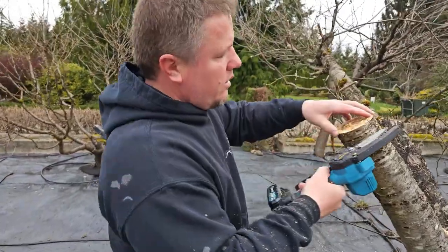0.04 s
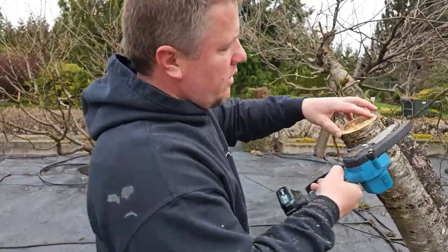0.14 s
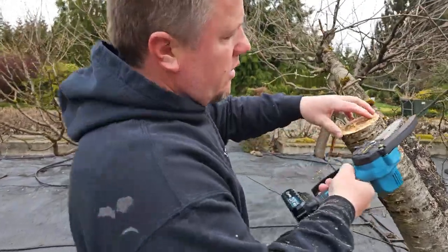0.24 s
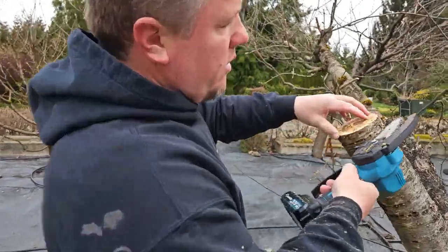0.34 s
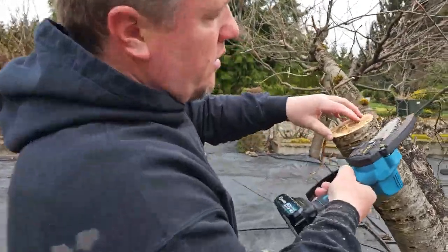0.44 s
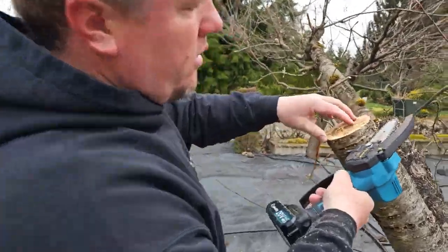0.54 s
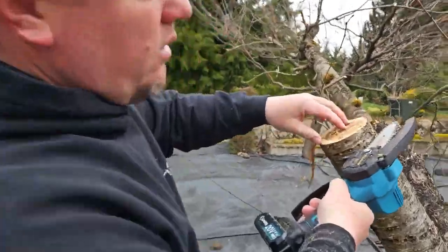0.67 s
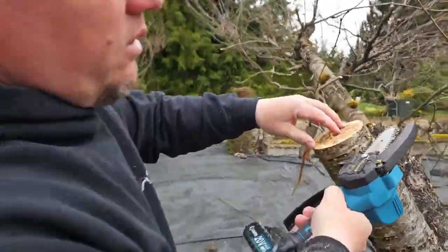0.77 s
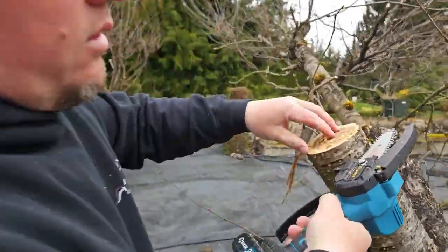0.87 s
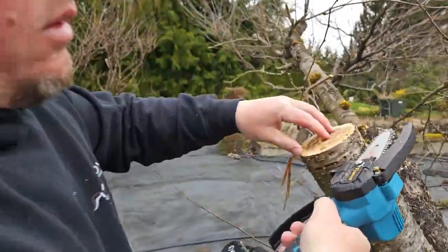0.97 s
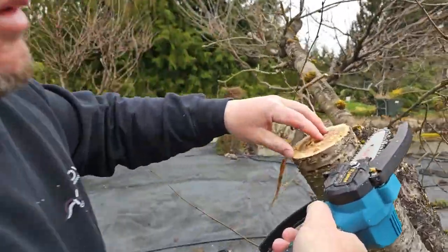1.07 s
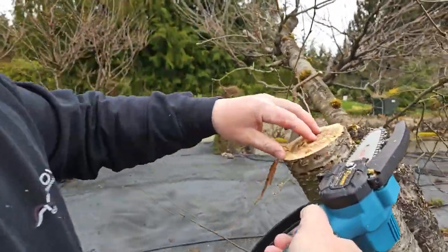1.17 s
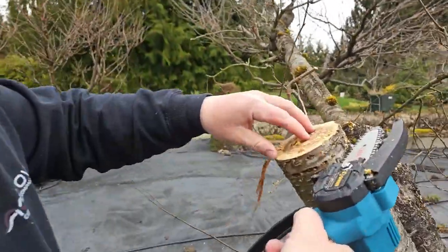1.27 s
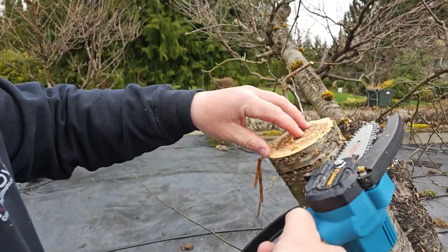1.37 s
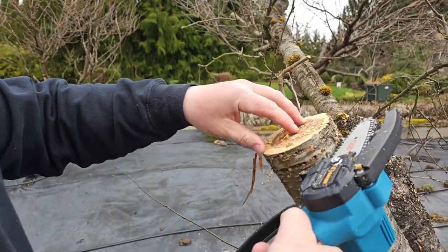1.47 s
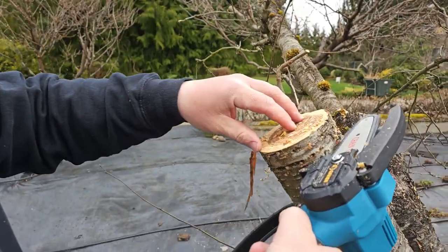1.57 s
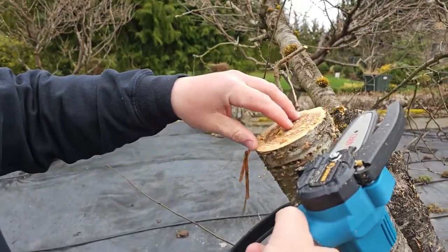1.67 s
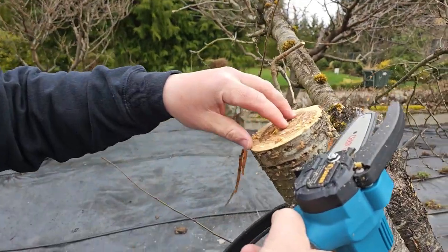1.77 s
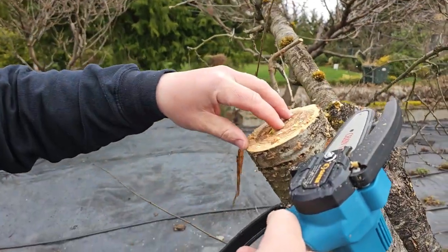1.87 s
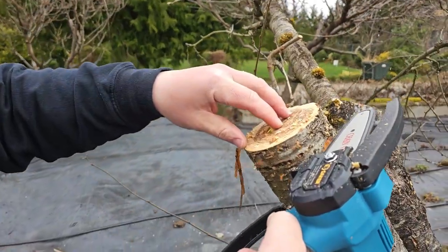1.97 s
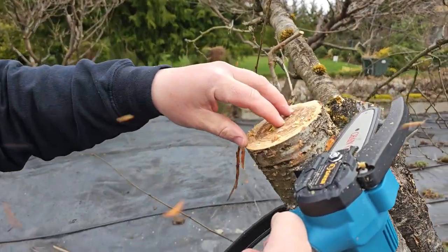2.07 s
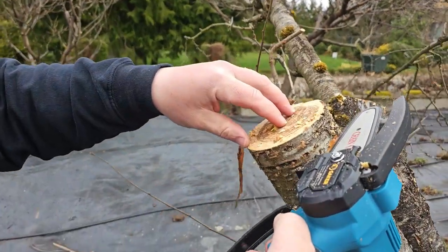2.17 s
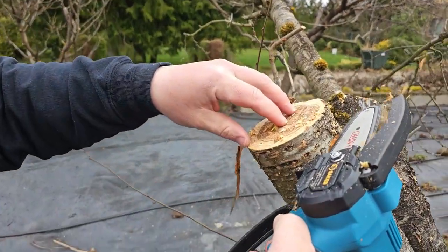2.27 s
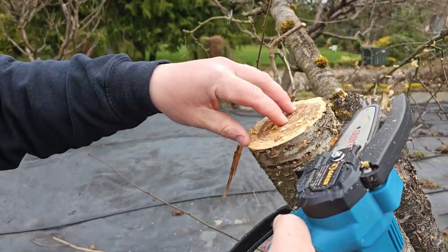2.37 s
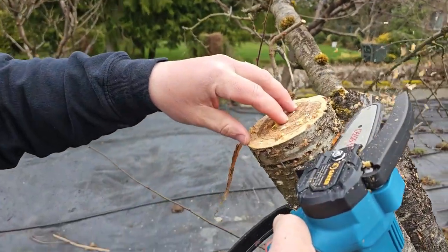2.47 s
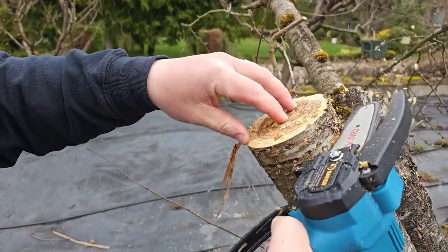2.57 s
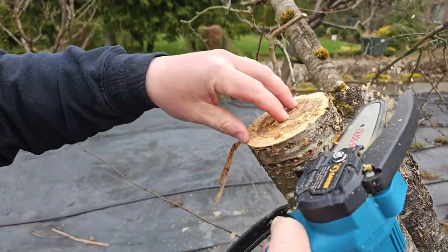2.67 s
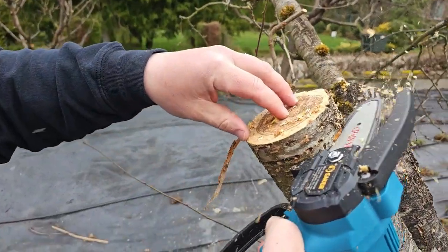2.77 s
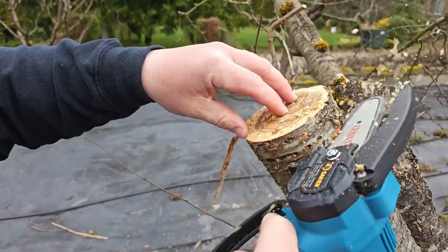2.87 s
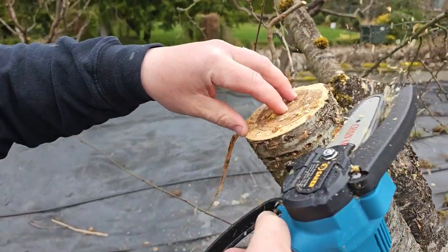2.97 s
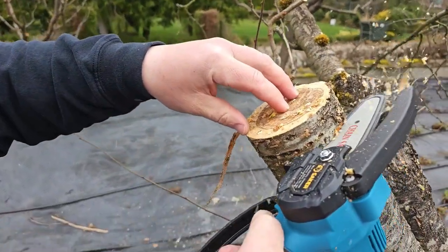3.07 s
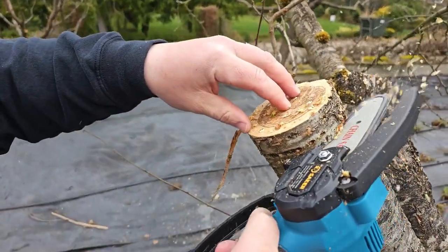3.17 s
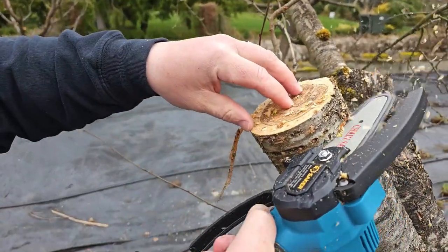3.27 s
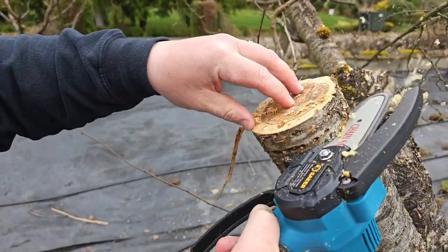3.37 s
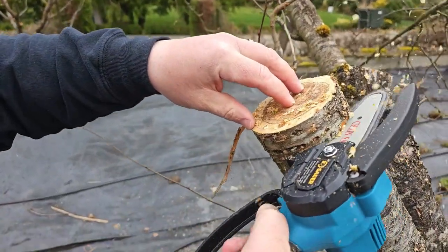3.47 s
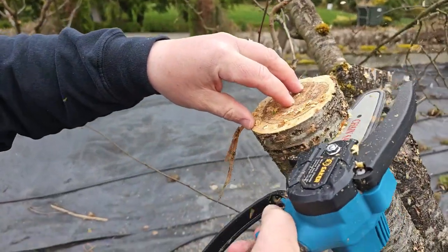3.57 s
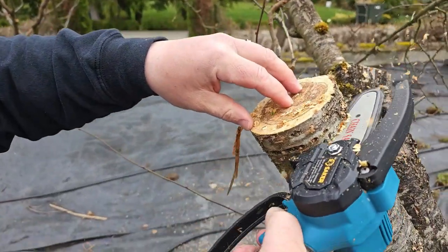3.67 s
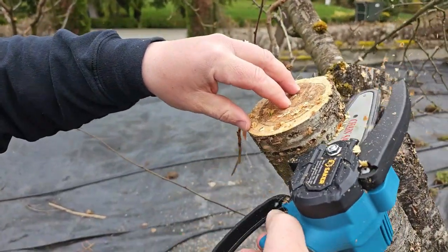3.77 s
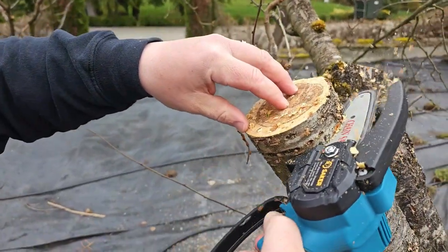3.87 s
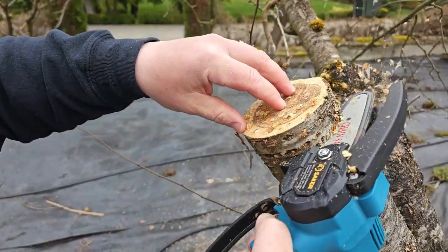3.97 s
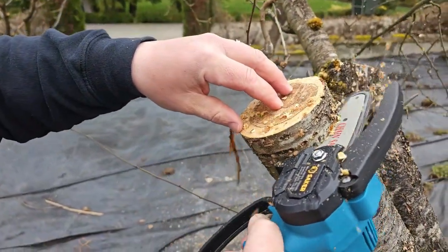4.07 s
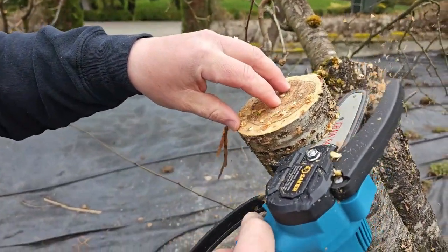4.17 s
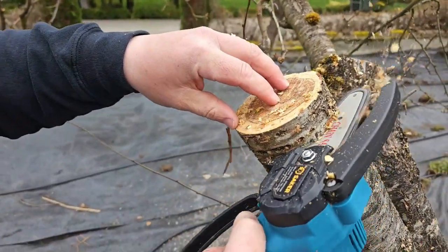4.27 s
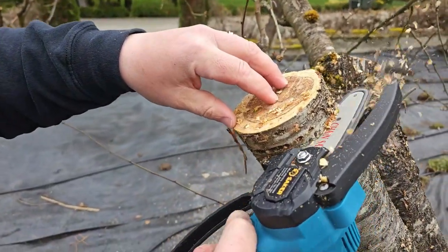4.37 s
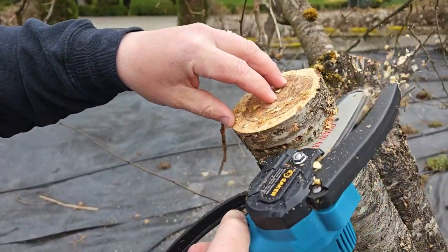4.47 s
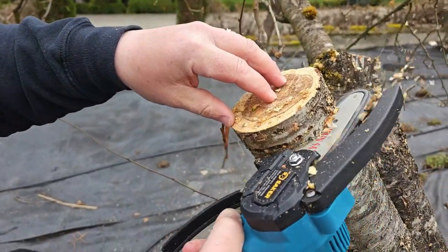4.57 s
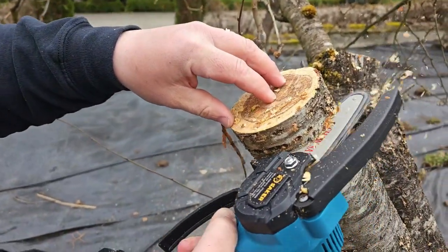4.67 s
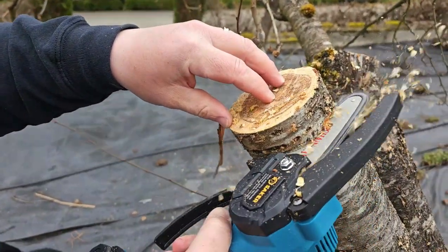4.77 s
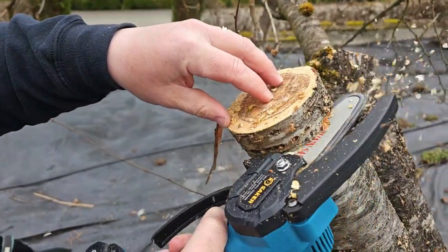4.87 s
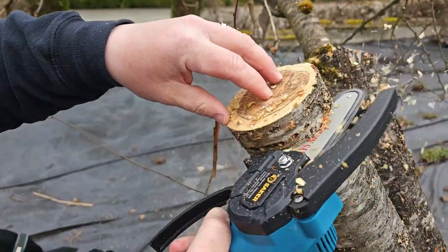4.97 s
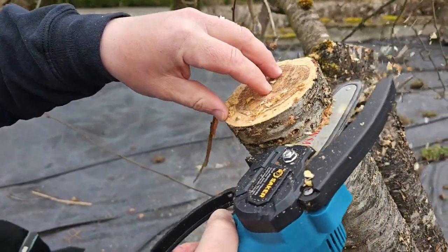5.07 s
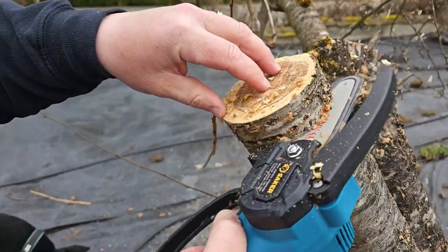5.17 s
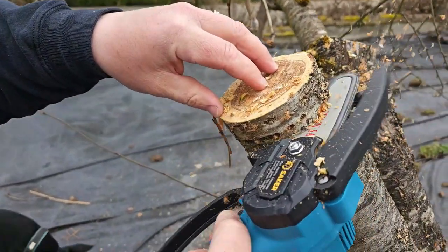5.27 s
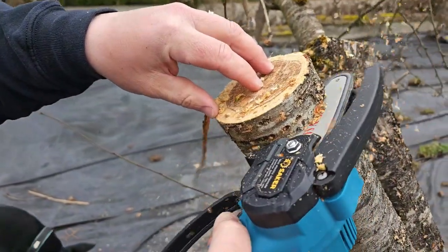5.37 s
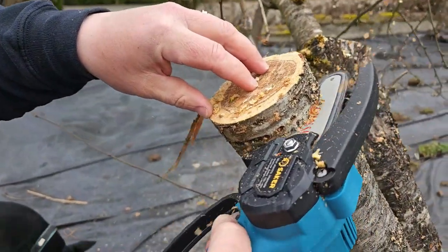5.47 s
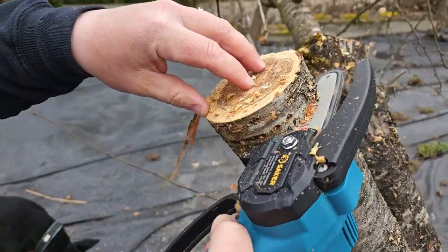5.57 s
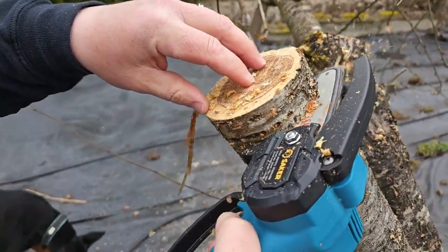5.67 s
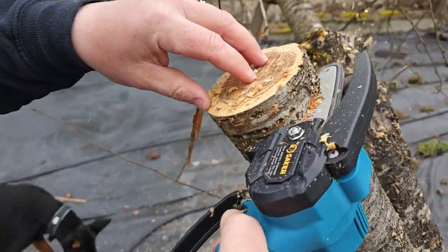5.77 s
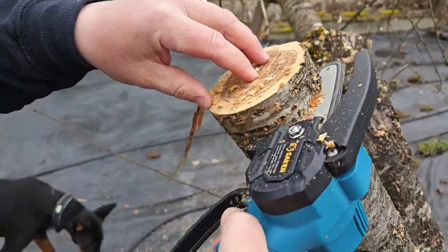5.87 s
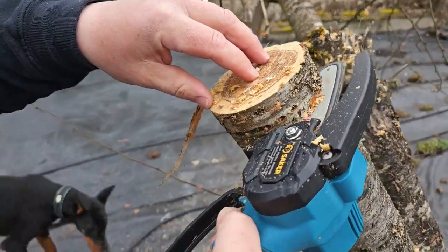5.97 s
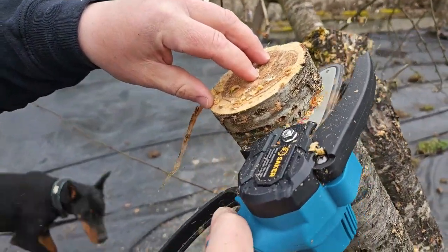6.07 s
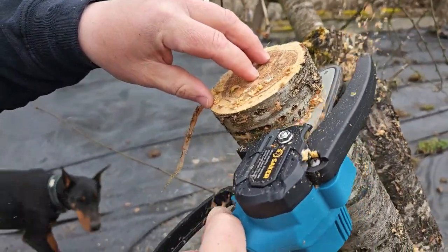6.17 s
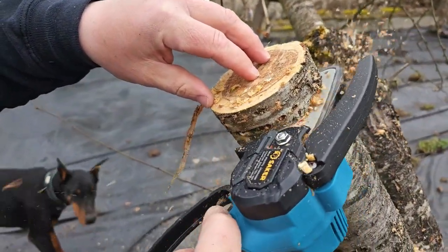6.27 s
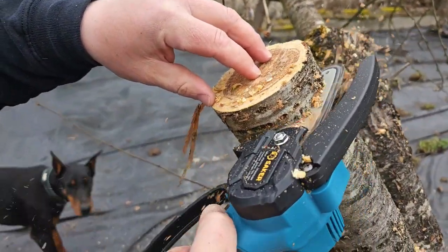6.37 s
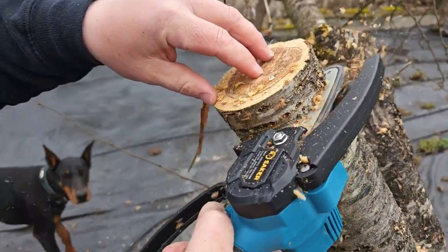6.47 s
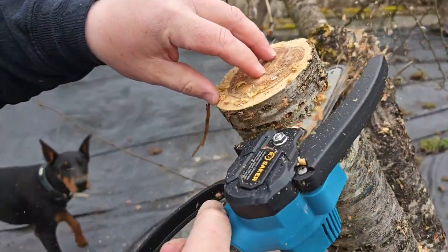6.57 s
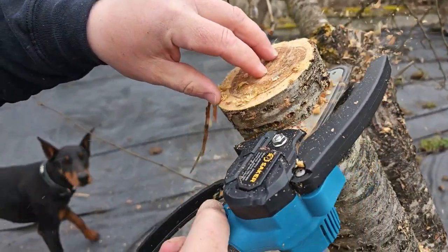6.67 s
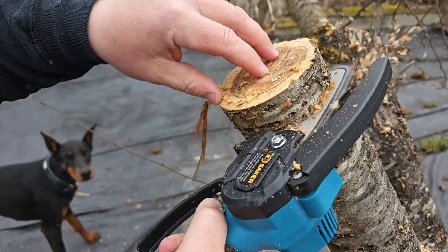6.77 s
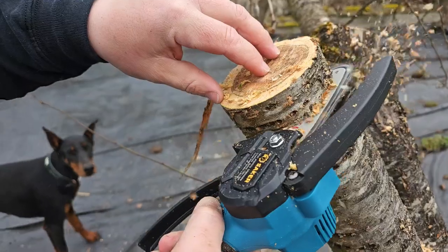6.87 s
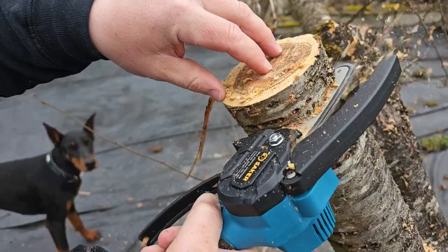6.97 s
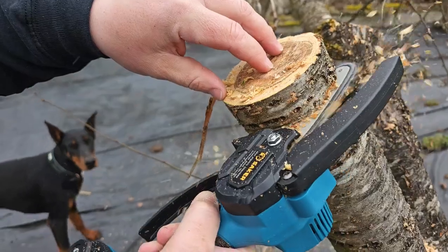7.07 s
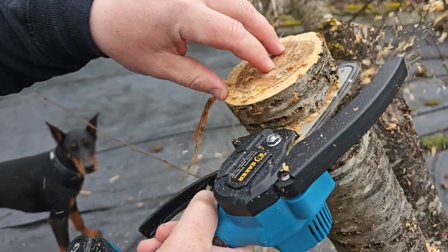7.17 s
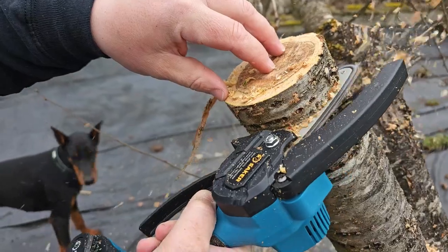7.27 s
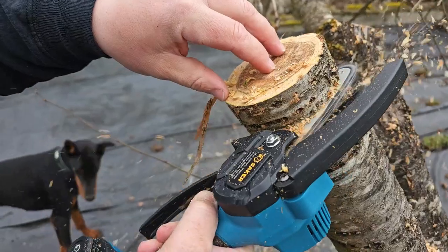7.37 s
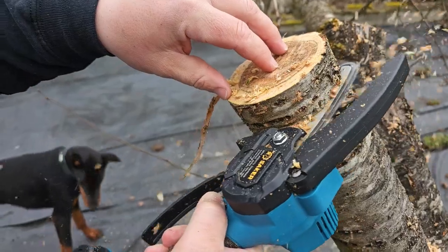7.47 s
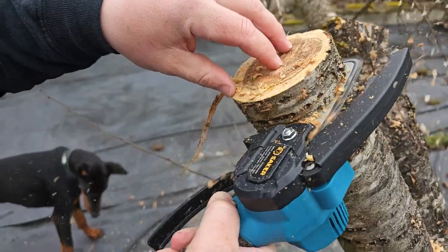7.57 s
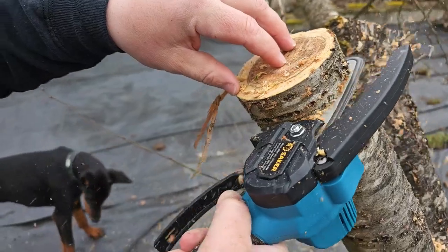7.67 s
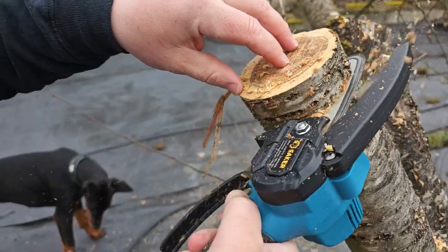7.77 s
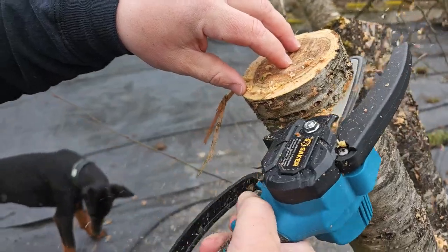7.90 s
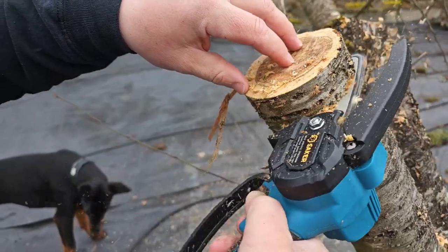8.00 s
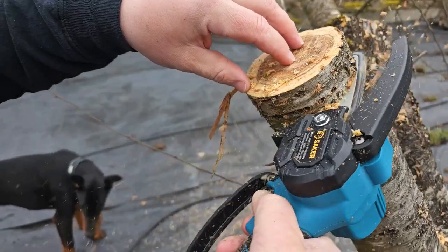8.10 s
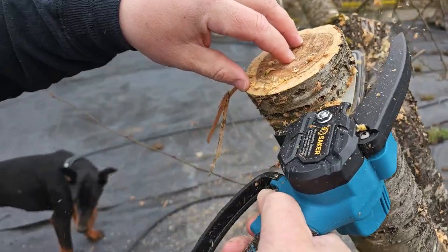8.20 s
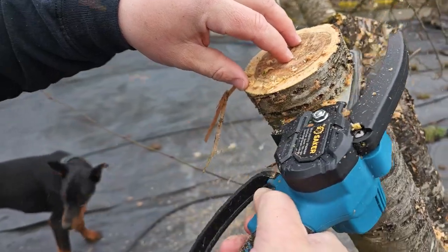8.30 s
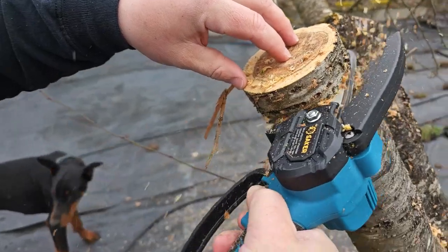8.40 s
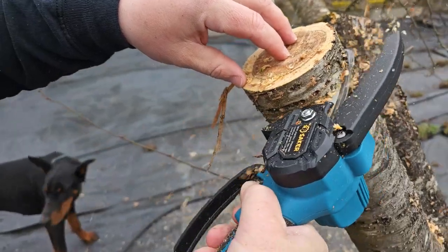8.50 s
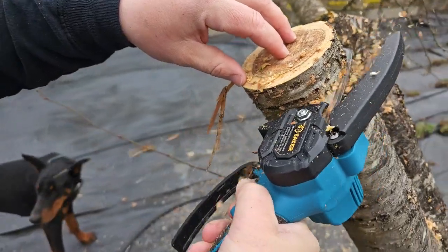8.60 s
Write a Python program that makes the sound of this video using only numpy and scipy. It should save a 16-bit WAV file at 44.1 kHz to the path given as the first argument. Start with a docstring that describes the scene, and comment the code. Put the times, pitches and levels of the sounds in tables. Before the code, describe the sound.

After a hushed outdoor pause with tiny handling noises, an electric mini chainsaw snaps to full speed, its raspy buzz sagging as it bites wood.

```python
"""A small battery chainsaw is switched on in a garden and cuts through a branch close to a stereo microphone.
The motor is a few low turn orders and a wobbling gear whine; chain, bar and wood are resonances struck by
random contacts, with single slaps and hard bites on top. Wind on the microphone ports is low shaped noise.
Before the start a sleeve rustles, the bar drags on bark and small things tick; a distant garden murmurs."""
import sys
import numpy as np
from scipy import signal
from scipy.fft import rfft, irfft
from scipy.io import wavfile
from scipy.ndimage import uniform_filter1d

SR = 44100
rng = np.random.default_rng(int(sys.argv[2]) if len(sys.argv) > 2 else 0)


def undo_db(level):
    """Turn decibels back into plain size, where 20 dB means ten times bigger."""
    steps = np.asarray(level, float) / 20
    return 10 ** steps


def materialize(psi):
    """Save the field psi as 16-bit PCM at rate SR to the path in sys.argv[1].

    A 1-D psi becomes a single channel; in a 2-D psi each row is a channel.
    """
    bounded = np.clip(np.atleast_2d(psi).T, -1, 1)
    quanta = np.round(bounded * 32767).astype(np.int16)
    wavfile.write(sys.argv[1], SR, quanta)


N = 381024   # samples, 8.64 s

# All levels stand ahead of the gain in record();
# those of the motor, chain and clinks also ahead of spin_up(); the snags are not.
# Resonance tables: centre_hz, width_hz (nominal), level_db (relative), left_right_likeness, right_lag_ms
# the wood, from its body up to a bright edge
WOOD = [(1160, 185, -9.5, 0.92, -0.21), (1293, 275, -3.5, 0.72, -0.33), (1695, 168, 0.5, 0.99, 0.067),
        (2074, 135, 0.5, 0.99, -0.036), (2260, 193, -1.5, 0.94, -0.048), (5440, 600, -5, 1, 0.038)]
# the low rumble of the cut
KERF = [(677, 77, -9.5, 0.99, -0.11), (763, 83, -3.5, 0.92, -0.17), (965, 175, -10, 0.86, -0.18)]
# the free length of the bar
BLADE = [(2830, 280, -3, 1, 0.33), (3520, 300, -3, 0.96, -0.023), (3950, 560, -0.5, 0.94, 0.072)]
# the ringing bar
BAR = [(7695, 650, -0.5, 0.82, 0.028), (8300, 520, -1.8, 0.92, 0.027)]
# the ringing chain links
LINKS = [(9390, 620, -0.5, 0.69, 0.0094), (10110, 420, -3.5, 0.47, 0.0033)]
# the hiss on top of the metal
HISS = [(12960, 2500, -5, 0.32, -0.016), (15000, 1450, 0, 0.49, -0.046)]
# the chain gathers speed: time_s, level_db
SPIN_UP = [(1.63, -75), (1.639, -17.5), (1.649, -14.5), (1.66, -7.5), (1.68, -8)]

TURNS_PER_SPROCKET = 6.5   # motor turns in one sprocket turn
SWAY_MS = .025   # spread: the saw sways, so the path to the right port keeps changing


def motor(turns, speed):
    """Low orders of the turn fade as the speed sags; a tooth whine wobbles with the uneven load."""
    free_turns_per_s, gear_teeth = 416, 12
    start_surge_db = 7
    # (dB running free, dB lost per turn/s below free speed, lowest dB under load)
    orders = [(-36.5, 0.14, -53), (-39.5, 0.12, -56.5), (-37, 0.13, -49)]
    # the hum stands out briefly: time_s, half_length_s, level_db
    hum_bumps = [(3.6, 0.16, -44), (5.4, 0.16, -43), (5.8, 0.26, -42), (7.92, 0.13, -37)]
    # the third order does too: time_s, half_length_s, level_db
    third_bumps = [(3.4, 0.23, -36), (4.6, 0.24, -34), (7.5, 0.61, -36), (7.87, 0.082, -34.5)]
    # gear whine, mostly up when the speed sags: time_s, level_db
    whine_levels = [(1.64, -11), (1.66, -17), (1.68, -37), (1.72, -42), (2.4, -56), (2.7, -36), (3.6, -31),
                    (3.9, -27.5), (4.2, -38), (4.4, -26.5), (4.85, -25), (5.05, -28), (5.18, -23),
                    (5.3, -26), (5.6, -36), (5.8, -23), (6.0, -33.5), (6.2, -26.5), (6.9, -24.5),
                    (7.2, -23), (7.75, -24.5), (8.08, -24), (8.35, -28), (8.64, -28)]

    sag = free_turns_per_s - speed
    hum_db, second_db, third_db = [
        np.maximum(free_db + start_surge_db * surge() - loss * sag, loaded_db)
        for free_db, loss, loaded_db in orders]
    hum_db = swells(hum_bumps, 6, hum_db)
    third_db = swells(third_bumps, 3.2, third_db)
    fourth_db = second_db + 6.5

    angle = 2 * np.pi * turns
    hum = undo_db(hum_db + 0.76 * drift(9.2)) * np.sin(angle)
    hum += undo_db(second_db + 1.5 * drift(9.8)) * np.sin(2 * angle)
    hum += undo_db(fourth_db + 2 * drift(17)) * np.sin(4 * angle)
    rough_third = undo_db(third_db) * smeared(3 * angle, width=18)
    hum = np.sqrt(2) * hum + rough_third
    hum = np.array([hum, 1.07 * np.roll(hum, 3)])   # right port: 3 samples later

    # the load jerks the gear speed at random, the sprocket once a turn (shares of the speed)
    jerks = .015 * drift(40)
    sprocket_ripple = .02 * np.sin(angle / TURNS_PER_SPROCKET + drift(5.96))
    teeth = gear_teeth * (angle + 2 * np.pi * np.cumsum(speed * (jerks + sprocket_ripple)) / SR)
    mid, side = [undo_db(-7) * smeared(teeth, width=130) for _ in range(2)]   # blur under the tone
    mid = mid + np.sqrt(2) * undo_db(2.8 * drift(45) - 2.5) * np.sin(teeth)
    whine = np.array([mid + 0.1 * side, mid - 0.23 * side])
    whine_db = in_time(whine_levels, None)[0] + 1.0 * drift(27)
    return spin_up() * (hum + undo_db(whine_db) * whine)


def chain(turns, speed):
    """Metal parts beat with the motor turn and its half; the cutters bite the wood unevenly."""
    loaded_turns_per_s = 300
    # wood, kerf, broad noise: (dB, start surge dB, dB gained over the cut, dB per turn/s under loaded speed)
    parts = [(-23, 5, 3, -0.006), (-35.5, -7, 3, 0.02), (-18.5, 5.5, 0.76, 0.0069)]
    # the low rumble of the cut swells: time_s, half_length_s, level_db
    kerf_bumps = [(5.3, 0.37, -29), (7.55, 0.62, -28)]
    # metal rings and branch hum: time_s, bar_db, links_db, hiss_db, branch_db
    ring_levels = [(1.7, -16.5, -15, -14.5, -34), (1.9, -14.5, -18.5, -17, -51),
                   (2.1, -20, -21, -16.5, -51), (2.55, -19, -23.5, -17.5, -37.5),
                   (3.3, -18.5, -25, -16.5, -40), (3.8, -18.5, -18, -18, -40), (4.05, -15.5, -22, -17, -32),
                   (4.3, -18.5, -24, -17, -44.5), (5.05, -20, -20.5, -20, -41),
                   (5.35, -19, -20, -16.5, -37.5), (6.0, -21, -21.5, -19, -41),
                   (6.4, -21, -21.5, -18.5, -33), (6.6, -21.5, -21.5, -19.5, -35),
                   (7.3, -20, -18, -20, -43), (8.05, -17.5, -20.5, -17, -39), (8.3, -17.5, -24, -18, -42),
                   (8.64, -21.5, -22.5, -24, -36)]
    # the free bar, damped as it is buried: time_s, level_db
    blade_levels = [(1.7, -22.5), (2.3, -25), (3.0, -27.5), (4.0, -26), (5.0, -28), (5.6, -24.5),
                    (6.2, -26), (7.3, -30), (8.0, -28), (8.64, -26)]
    # hum of the branch: centre_hz, width_hz, level_db, left_right_likeness, right_lag_ms
    branch = [(363, 28.6, 0, 0.84, 0.045)]
    # the nearly severed branch end: centre_hz, width_hz, level_db, left_right_likeness, right_lag_ms
    thrum = [(194, 84, 0, 0.9, 0.01)]
    # colour of the broad chain noise: pitch_hz, density_db (per Hz)
    air = [(120, -28), (200, -17), (300, -16), (500, -8.5), (1000, -5), (3000, -2), (4500, -4.5),
           (5400, -2), (6500, -3.5), (8000, -2), (11500, -7), (16000, -50)]

    load = (loaded_turns_per_s - speed) * (depth() > 0)
    wood_db, kerf_db, air_db = [db + surge_db * surge() + depth_db * depth() + load_db * load
                                for db, surge_db, depth_db, load_db in parts]
    kerf_db = swells(kerf_bumps, 2.5, kerf_db)
    bar_db, link_db, hiss_db, branch_db = in_time(ring_levels, None)
    blade_db, = in_time(blade_levels, None)
    thrum_db = -46.5 - 33 * (1 - depth())

    # all parts shake together, at random and once a sprocket turn
    sprocket_db = 0.77 * np.cos(2 * np.pi * turns / TURNS_PER_SPROCKET)
    shake = undo_db(0.97 * drift(37) + 0.81 * drift(65) + sprocket_db)
    turn = shake * undo_db(1.9 * np.cos(2 * np.pi * turns) + .8 * np.cos(np.pi * turns))
    bite = shake * undo_db(0.99 * drift(45))

    out = undo_db(wood_db) * rattle(WOOD, 3500, 3.3, bite, flicker_db=0.85, sway_ms=.5 * SWAY_MS)
    out += undo_db(blade_db) * rattle(BLADE, 3500, 3.4, bite, flicker_db=1.3, sway_ms=.5 * SWAY_MS)
    out += undo_db(kerf_db) * rattle(KERF, 1200, 2.8, bite, flicker_db=0.2)
    out += undo_db(branch_db) * rattle(branch, 1200, 3.0, bite, flicker_db=1.0)
    out += undo_db(thrum_db) * rattle(thrum, 1200, 2.1, bite, flicker_db=0.5)

    metal_sway_ms = .006   # the same kind of sway as the short metal rings meet it
    out += undo_db(bar_db) * rattle(BAR, 6000, 1.4, turn, flicker_db=0.55, sway_ms=metal_sway_ms)
    out += undo_db(link_db) * rattle(LINKS, 6000, 1.6, turn, flicker_db=0.9, sway_ms=metal_sway_ms)
    out += undo_db(hiss_db) * rattle(HISS, 8000, 2.8, turn, flicker_db=1.1)

    left, other = coloured(air, contacts(9000, 1.86, turn))
    right = 0.43 * later(left, 3 * SWAY_MS * drift(0.34)) + 0.93 * other
    out += undo_db(air_db) * np.array([left, right])
    return out * spin_up()


def rattle(modes, per_s, spread_db, beat, flicker_db, sway_ms=SWAY_MS):
    """Every resonance is struck by contacts of its own, from its own swaying place; rms 1."""
    out = 0
    for mode in modes:
        hit = rms_one(contacts(per_s, spread_db, beat))
        out = out + undo_db(flicker_db * drift(10.4)) * heard(mode, hit, sway_ms * drift(0.31))
    return rms_one(out)


def snags(turns):
    """Single hard bites ring the wood; lesser ones gather once a sprocket turn, harder as the cut deepens."""
    # a cutter snags in the wood: time_s, strength_db (relative)
    bites = [(3.3338, -12), (4.0842, -3), (4.3925, -8.5), (5.978, -4), (6.1996, -6), (6.2854, -8),
             (6.4231, -4), (6.4921, -1), (6.5816, -2), (6.6522, -9), (6.8208, -12), (6.9525, -9),
             (7.462, -17), (7.6135, -9), (7.778, 0), (7.93, -5), (8.012, -6), (8.06, 2), (8.072, -4),
             (8.084, -6), (8.295, -7), (8.541, -1), (8.603, -3.5)]
    tear_s = .0025   # a bite tears for a moment
    s, strength_db = np.transpose(bites)
    at = np.round(s * SR).astype(int)
    clicks = np.zeros((2, N))
    clicks[:, at] = undo_db(strength_db + 22.5) * np.sign(rng.standard_normal((2, len(at))))
    tear_level = signal.lfilter([1], [1, -np.exp(-1 / (tear_s * SR))], abs(clicks))
    clicks = .6 * clicks + 0.081 * rng.standard_normal((2, N)) * tear_level

    sprocket = np.exp(4 * np.cos(2 * np.pi * turns / TURNS_PER_SPROCKET + .6 * drift(5)) - 4)
    lesser_db = np.where(depth() > 0, -4.0 + 10.0 * depth(), -60)
    clicks += undo_db(lesser_db) * contacts(450, 2.4, sprocket)

    in_wood = sum(heard(mode, clicks, 0) for mode in KERF + WOOD[:-1])
    on_blade = sum(heard(mode, clicks, 0) for mode in BLADE[:2])
    return in_wood + undo_db(-7) * on_blade   # the bar hardly rings with it


def clinks():
    """Single slaps and a random chatter of lesser ones ring all the metal and the top of the wood at once."""
    # a link slaps the bar: time_s, strength_db (relative)
    slaps = [(3.7014, -7), (3.9104, -3), (4.0867, -5), (4.1064, -8), (4.236, -5), (4.3937, -5),
             (4.4814, -8), (5.7154, -7), (7.2674, -3), (7.8625, -17), (7.9533, -9), (8.502, -4),
             (8.626, -5)]
    s, strength_db = np.transpose(slaps)
    clicks = np.zeros((2, N))
    clicks[:, (s * SR).astype(int)] = undo_db(strength_db + 21)
    clicks += undo_db(-0.5) * contacts(140, 2.1, 1)
    return sum(heard(mode, clicks, 0) for mode in BAR + LINKS + HISS + WOOD[-1:])


def spin_up():
    """Gain of the saw as the chain gathers speed, silent before the start."""
    s, spin_db = np.transpose(SPIN_UP)
    return undo_db(np.interp(np.arange(N) / SR, s, spin_db, left=-120))


def surge():
    """1 at the start, settling to 0; each part's surge dB sets how its level starts higher or lower."""
    settle_s = 0.46
    return np.exp(-np.maximum(np.arange(N) / SR - SPIN_UP[-1][0], 0) / settle_s)


def depth():
    """How far the bar is through the branch, 0-1; it sinks evenly."""
    cut_from_s, cut_to_s = 2.4, 8.64
    return np.interp(np.arange(N) / SR, [cut_from_s, cut_to_s], [0, 1])


def wind():
    """Low buffeting, partly its own at each port; each gust is one even push."""
    # breeze on the ports: time_s, level_db
    breeze = [(0, -63.5), (1.5, -57.5), (1.9, -63), (2.45, -73), (3.0, -57), (3.6, -54), (4.0, -51),
              (5.0, -49), (5.5, -51.5), (6.2, -45.5), (6.8, -47.5), (7.8, -49.5), (8.2, -49), (8.64, -48.5)]
    # colour of the buffeting: pitch_hz, density_db (per Hz)
    buffet = [(12, -40), (25, -7), (40, -4), (55, 2), (80, -5), (124, -7.5), (172, -11.5), (259, -12),
              (300, -9), (390, -17.5), (660, -120)]
    # single gusts: time_s, half_length_s, peak_db, left_over_right_db
    gusts = [(0.068, 0.083, -45.5, 7), (0.364, .025, -54, -13), (0.536, 0.027, -46, 8),
             (0.618, .03, -47, -1), (0.688, .025, -51, -1), (0.897, 0.028, -50, 1), (1.47, 0.038, -49.5, 3),
             (2.532, 0.044, -54, 1), (2.774, 0.031, -47.5, -3), (2.932, .05, -51, 1),
             (3.668, 0.048, -44, -6), (3.977, .04, -46, -13), (4.14, 0.084, -45.5, 4),
             (4.307, 0.029, -33, 0), (4.46, 0.058, -44, 0), (4.705, .04, -43, 1), (4.884, 0.021, -43, 3),
             (5.679, 0.024, -37, 2), (5.8, 0.081, -35, 0), (6.1, 0.033, -40, -9), (6.49, .04, -44, 1),
             (6.736, .04, -43, -0.5), (6.948, .03, -47, 1), (7.14, 0.05, -41, -2), (8.395, 0.043, -46, -1)]
    lumpy_db, veer_db = 2.5, 1   # chance swing of level and side

    wind_db, = in_time(breeze, None)
    breeze_db = wind_db + lumpy_db * drift(6.3)
    level_db = swells([row[:3] for row in gusts], 13.5, breeze_db)
    s, half, peak_db, side_db = np.transpose(gusts)
    gust_side_db = np.interp(np.arange(N) / SR, s, side_db)
    pan_db = np.where(level_db > breeze_db, gust_side_db, veer_db * drift(3.8))
    pan_db = uniform_filter1d(pan_db, size=400)

    left, right, both = coloured(buffet, rng.standard_normal((3, N)))
    ports = np.array([left, right]) + 0.69 * both
    # stronger wind is brighter above 100 Hz
    flutter = signal.sosfilt(signal.butter(2, 100, "high", fs=SR, output="sos"), ports)
    ports += (undo_db(.5 * (wind_db + 51)) - 1) * flutter
    ports /= np.sqrt(uniform_filter1d(ports ** 2, size=2200) + 0.18)   # evens the push over 50 ms
    return undo_db(level_db + pan_db * np.array([[.5], [-.5]])) * ports


def rubbing():
    """A sleeve rubs, then the bar drags on bark: grains of contact, each rub over a faint resting rustle."""
    # colour of the sleeve: pitch_hz, density_db (per Hz)
    sleeve = [(410, -43), (700, 3), (840, -3), (1090, 2), (1610, -4), (4910, -5.5), (7640, -7.5),
              (9650, -6.5), (15600, -9)]
    # colour of the bark: pitch_hz, density_db (per Hz)
    bark = [(240, -30), (400, -3), (700, 0), (1100, -1), (2130, -6), (3220, -13), (5670, -16), (7360, -14),
            (15600, -16)]
    # rubs: start_s, length_s, level_db
    rubs = [(0.027, 0.035, -57), (0.37, 0.065, -58.5), (0.485, 0.052, -56), (1.46, 0.17, -56.5)]
    bark_from_s = 1.4
    attack_db_per_s, release_db_per_s, rest_db = 500, 198, -76

    t = np.arange(N) / SR
    grains = contacts(6000, 2.3, undo_db(2.5 * drift(40)))
    rub = np.where(t < bark_from_s, coloured(sleeve, grains), coloured(bark, grains))
    level_db = rest_db + 0 * t
    for s, length, db in rubs:
        rise_db = attack_db_per_s * np.maximum(s - t, 0)
        fall_db = release_db_per_s * np.maximum(t - s - length, 0)
        level_db = np.maximum(level_db, db - rise_db - fall_db)
    return undo_db(level_db) * stereo(*rub)


def scuffs():
    """Short dry scuffs: brief grainy bursts in one broad resonance."""
    # scuffs: start_s, length_s, level_db, pitch_hz
    bursts = [(0.326, 0.015, -61.5, 1580), (.42, .015, -67, 2800), (.53, 0.036, -64, 1100),
              (1.472, 0.099, -72, 2300)]
    t, out = np.arange(N) / SR, 0
    for s, length, db, hz in bursts:
        grains = contacts(5000, 2.0, 1)
        body = rms_one(resonate(resonate(grains, hz, 0.82 * hz), hz, 0.83 * hz))
        level_db = db - 2300 * np.maximum(s - t, 0) - 1000 * np.maximum(t - s - length, 0)
        out = out + undo_db(level_db) * stereo(*body)
    return out


def creak():
    """A faint rising creak, perhaps the trigger: a rough tone with its octave."""
    # course of the creak: time_s, pitch_hz, level_db
    course = [(1.46, 1005, -72), (1.48, 1054, -60), (1.53, 1230, -59), (1.555, 1300, -77)]
    hz, db = in_time(course, None)
    t = np.arange(N) / SR
    angle = 2 * np.pi * np.cumsum(hz) / SR
    tone = smeared(angle, width=70) + undo_db(-7) * smeared(2 * angle, width=70)
    return undo_db(db) * tone * (t > course[0][0]) * (t < course[-1][0])


def ticks():
    """Small things tick: short decaying tones with a rough edge and a soft onset."""
    # ticks: time_s, level_db, pitch_hz, ring_ms (decay time constant)
    taps = [(0.021, -49, 4400, 5.4), (.05, -48, 3620, 5.6), (.16, -54, 1700, 1.5), (.467, -48, 5010, 3),
            (.612, -52, 7000, .8), (0.842, -50, 8500, .6), (.985, -49, 2400, .8), (1.079, -58, 4500, .8),
            (1.207, -56, 7500, .8), (1.259, -60, 5000, .6), (1.301, -38, 650, 3.5), (1.302, -46, 1100, 2.2),
            (1.3025, -51, 2000, 2), (1.325, -58, 2150, 3), (1.324, -63, 5200, 1.2), (1.34, -62, 5100, 1.2)]
    out, t = np.zeros(N), np.arange(1300) / SR
    for s, level_db, hz, ring_ms in taps:
        crack = rng.standard_normal(1300)
        edge = rms_one(resonate(resonate(crack, hz, .5 * hz), hz, .5 * hz))
        ring = np.sin(2 * np.pi * hz * t) + 0.3 * edge
        onset = np.sin(np.pi / 2 * np.minimum(t * hz / 1.3, 1)) ** 2   # takes 1.3 periods
        out[round(s * SR):][:1300] += undo_db(level_db) * ring * np.exp(-1000 * t / ring_ms) * onset
    return out


def garden():
    """Distant garden murmur: shaped noise of slowly swinging level."""
    # colour of the murmur: pitch_hz, density_db (per Hz)
    murmur = [(55, -9), (85, -16), (150, -1), (300, 2.5), (500, 2), (750, -8), (1500, -15.5), (2900, -22.5),
              (5800, -36), (8500, -31), (10200, -19), (11400, -41), (16000, -36)]
    level_db = -62.5 + 2.5 * drift(11.0)
    return stereo(*(undo_db(level_db) * coloured(murmur, rng.standard_normal((2, N)))))


def contacts(per_s, spread_db, beat):
    """Two noise streams of random contacts of uneven size, at shared moments, stronger on the beat."""
    sizes = undo_db(spread_db * np.minimum(rng.exponential(1, N), 5))
    struck = rng.random(N) < per_s / SR
    return sizes * struck * beat * rng.standard_normal((2, N))


def heard(mode, hit, sway):
    """One resonance, twice filtered for dark valleys; the right port hears it partly alike and shifted."""
    hz, width, level_db, alike, lag_ms = mode
    pass_width = width * 1.77   # each pass is wider than the nominal width
    left, other = resonate(resonate(hit, hz, pass_width), hz, pass_width)
    alike = np.clip(alike, -1, 1)
    right = alike * later(left, lag_ms + sway) + np.sqrt(1 - alike ** 2) * other
    return undo_db(level_db) * np.array([left, right])


def resonate(x, hz, width):
    """A two-pole resonance with a gain of about 1 on top."""
    r = np.exp(-np.pi * width / SR)
    zeros = np.array([1, 0, -1]) * (1 - r * r) / 2
    poles = [1, -2 * r * np.cos(2 * np.pi * hz / SR), r * r]
    return signal.lfilter(zeros, poles, x + 1e-18)


def later(x, lag_ms):
    """Delays by a lag that may change with time; a negative lag comes earlier."""
    return np.interp(np.arange(N) - lag_ms * SR / 1000, np.arange(N), x)


def smeared(phase, width):
    """A tone blurred into a narrow noise band that follows the phase."""
    return drift(width) * np.cos(phase) + drift(width) * np.sin(phase)


def drift(rate):
    """Slow chance of rms 1: noise through two equal low-pass poles at the rate in Hz."""
    r = np.exp(-2 * np.pi * rate / SR)
    noise = rng.standard_normal(N + SR)
    return rms_one(signal.lfilter([1], [1, -2 * r, r * r], noise)[SR:])


def swells(rows, fall_db, rest_db):
    """Bumps, parabolic in dB, over a resting level; they fall by fall_db at half a length from the peak."""
    t = np.arange(N) / SR
    bumps = [db - fall_db * ((t - s) / half) ** 2 for s, half, db in rows]
    return np.max([rest_db + 0 * t] + bumps, axis=0)


def stereo(mid, side):
    """Left and right from a mid and a side that is weighted by pitch."""
    # width of the image: pitch_hz, side_gain_db
    image = [(60, -24), (110, -9.5), (200, -16), (380, -12), (700, -2), (1290, -2), (2380, -2), (4400, 1),
             (8120, 1), (15000, 1)]
    side = irfft(rfft(side) * undo_db(at_hz(image, np.fft.rfftfreq(N, 1 / SR))), N)
    return np.array([mid + side, mid - side])


def coloured(spectrum, x):
    """Weights the sound by a spectrum in dB; rms 1 over all channels."""
    return rms_one(irfft(rfft(x) * undo_db(at_hz(spectrum, np.fft.rfftfreq(N, 1 / SR))), N))


def at_hz(points, hz):
    """Values between the points on a logarithmic pitch scale."""
    hzs, values = np.transpose(points)
    return np.interp(np.log(hz + 1), np.log(hzs + 1), values)


def in_time(rows, before):
    """Each column drawn as straight lines over time; None holds the first value ahead of its time."""
    s, *columns = np.transpose(rows)
    return [np.interp(np.arange(N) / SR, s, column, left=before) for column in columns]


def rms_one(x):
    """Scales to rms 1."""
    return x / np.sqrt(np.mean(x ** 2) + 1e-20)


def scene():
    """The saw close by, wind on the ports, and the small sounds and garden around."""
    # motor speed, sagging under load: time_s, speed_turns_per_s
    speeds = [(1.63, 85), (1.652, 115), (1.675, 180), (1.715, 335), (1.76, 392), (1.9, 416), (2.1, 409),
              (2.4, 385), (2.6, 346), (3.05, 350), (3.4, 325), (3.95, 328), (4.2, 296), (4.45, 317),
              (4.8, 291), (4.95, 290), (5.18, 266), (5.3, 304), (5.6, 306), (5.8, 284), (5.98, 300),
              (6.2, 284), (6.6, 274), (6.85, 290), (7.05, 280), (7.17, 299), (7.65, 293), (7.85, 307),
              (8.15, 309), (8.45, 280), (8.64, 270)]
    speed, = in_time(speeds, 0)
    turns = np.cumsum(speed * (1 + 0.00304 * drift(21.0))) / SR
    saw = motor(turns, speed) + chain(turns, speed) + snags(turns) + spin_up() * clinks()
    handling = rubbing() + scuffs() + creak() + ticks()
    return saw + wind() + handling + garden()


def roll_off(x):
    """The treble ends steeply here."""
    return signal.sosfilt(signal.butter(12, 17080, fs=SR, output="sos"), x)


def record(dry):
    """The microphone signal: peaks are rounded, then the top is cut steeply above 15.73 kHz."""
    steep = signal.ellip(14, .5, 90, 15730, fs=SR, output="sos")
    rounded = 1.568 * np.tanh(dry / 1.136)
    mix = signal.sosfilt(steep, rounded)
    return roll_off(mix)


dry = scene()
out = record(dry)
materialize(out)
```